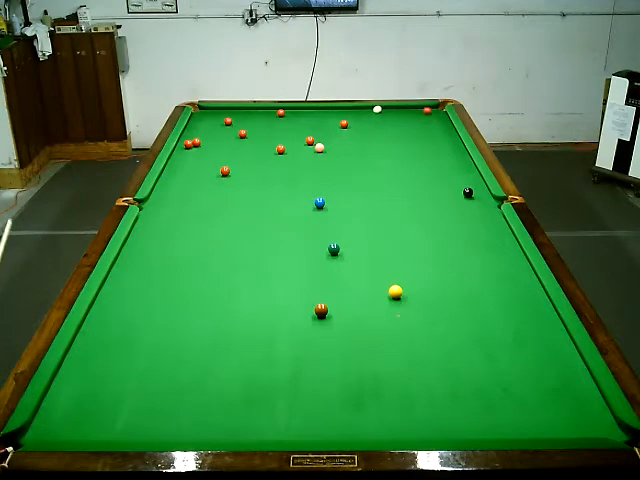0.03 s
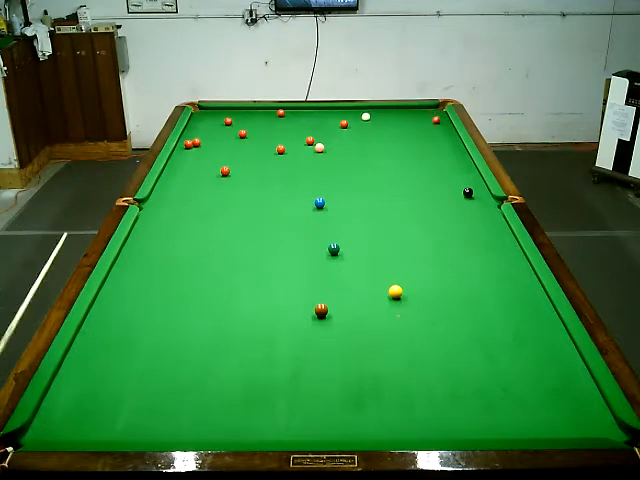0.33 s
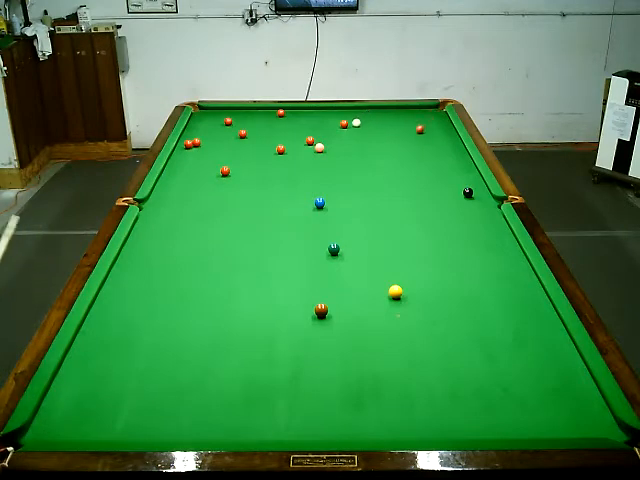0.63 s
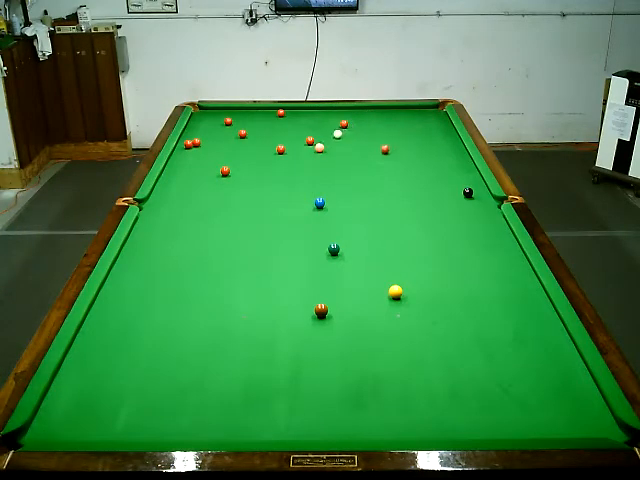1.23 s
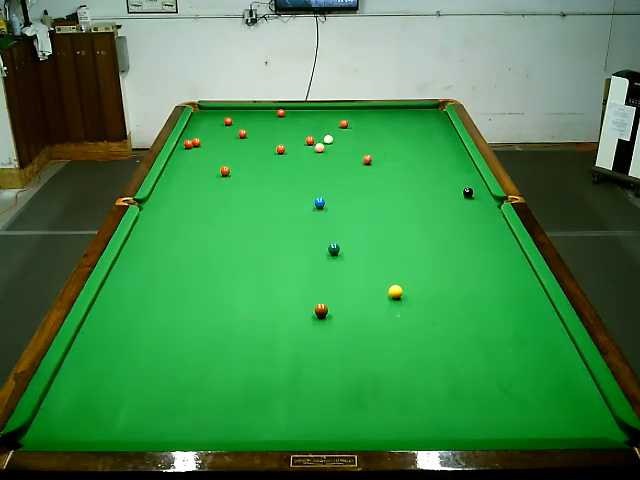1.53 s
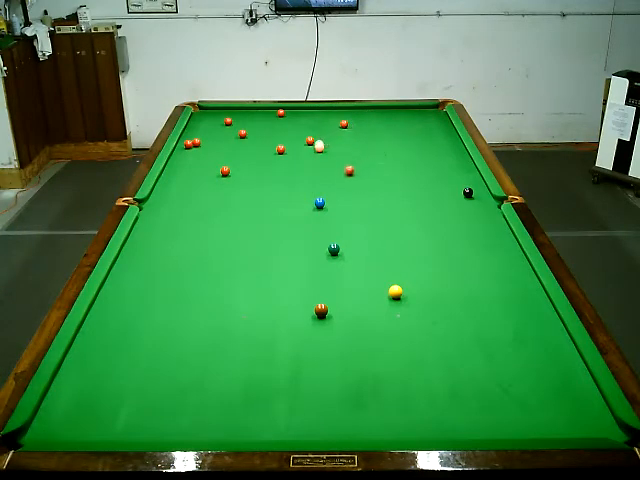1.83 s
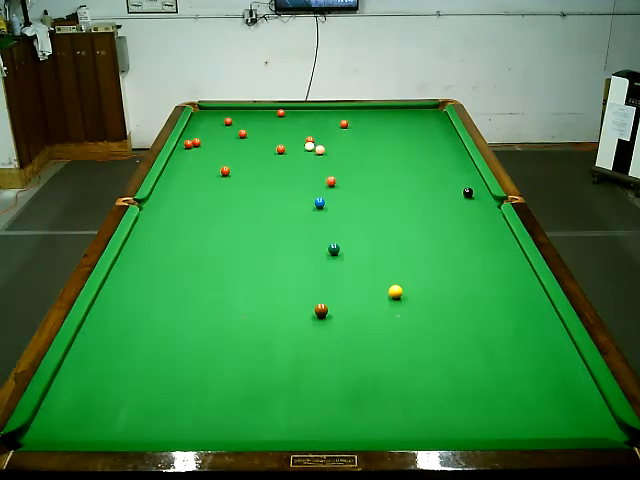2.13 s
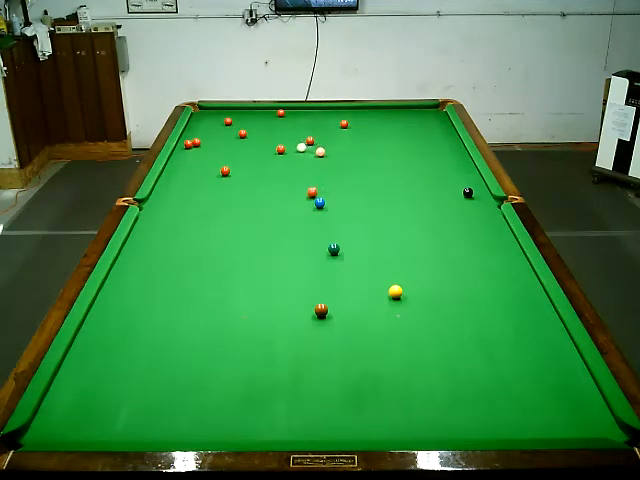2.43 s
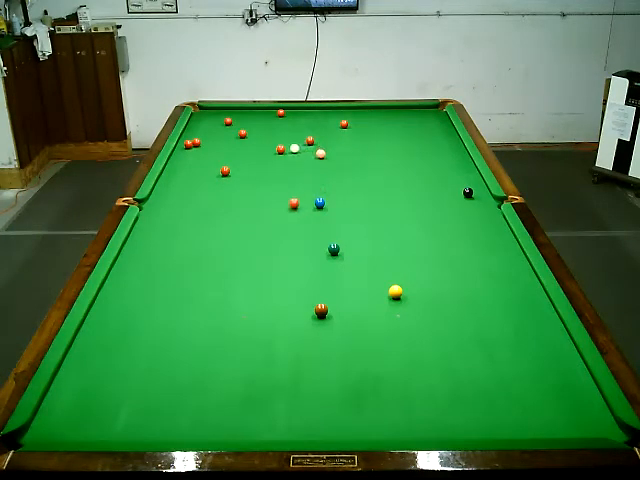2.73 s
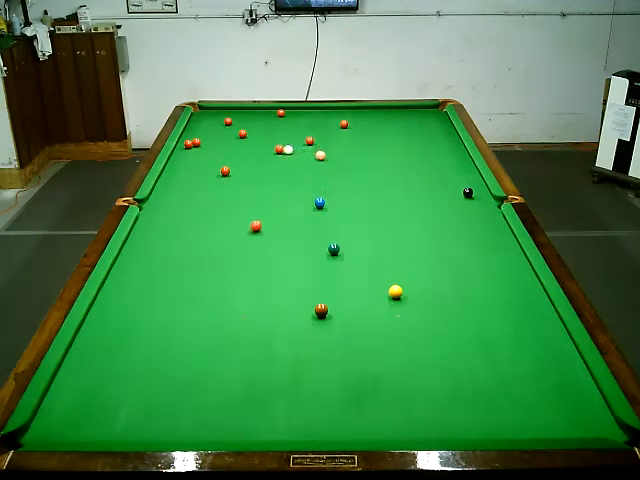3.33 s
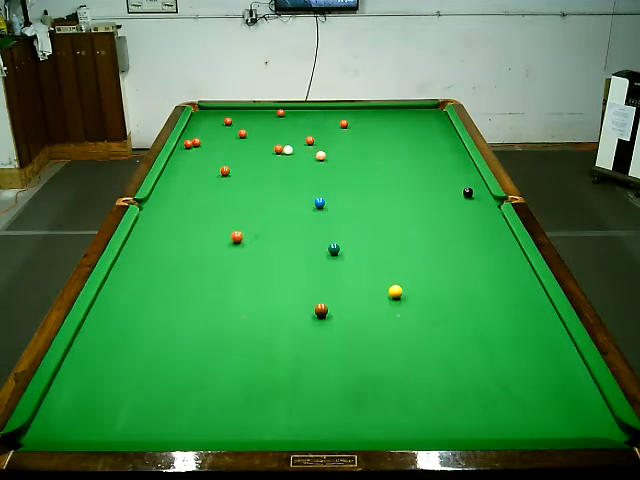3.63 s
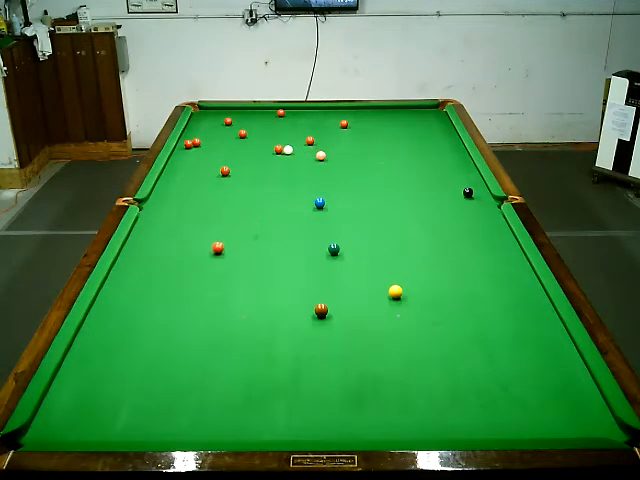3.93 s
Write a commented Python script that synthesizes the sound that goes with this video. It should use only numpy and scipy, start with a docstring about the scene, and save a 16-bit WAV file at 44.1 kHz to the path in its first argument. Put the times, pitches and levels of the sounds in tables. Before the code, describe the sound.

A sharp clack of snooker balls comes from the table's far end, followed immediately by a low knock against the cushion. Two seconds later comes a softer click. The small, dull microphone also catches the room's steady ventilation.

```python
"""A quiet club room, with snooker balls at the far end of the table from a small, dull microphone.
Two hard balls meet in one sharp clack that comes back off the walls and ceiling. Just after it a ball
thumps into the rubber cushion and sets the wooden rail ringing; two seconds after the clack, two balls
touch softly. Behind it all the ventilation rushes and hums, with a thin electrical whine."""
import sys
import numpy as np
from scipy import signal
from scipy.fft import rfft, irfft
from scipy.io import wavfile
from scipy.ndimage import uniform_filter1d

SR = 44100
rng = np.random.default_rng(int(sys.argv[2]) if len(sys.argv) > 2 else 0)


def to_wav(s):
    """Save 16-bit WAV."""
    ch = np.atleast_2d(s).T  # columns
    pcm = np.round(np.clip(ch, -1, 1) * 32767)  # PCM
    wavfile.write(sys.argv[1], SR, pcm.astype(np.int16))


N = 176400

# ball on ball, a slower touch lasting longer and sounding duller:
# t/s, level/dB, contact corner f/Hz, relative reverberation level/dB, relative ringing level/dB
BALL_CONTACTS = [(0.1073, 2.5, 4640, 3, -51.5), (2.1133, -12, 2440, -2.5, -46)]
# colour of a clack on the short paths to the microphone: f/Hz, level/dB
CLACK_NEAR_COLOUR = [(100, -41), (400, -20.5), (620, -12), (800, 0), (1080, 3.5), (1800, 2), (2300, 0),
                     (3100, 2), (3600, -4), (4300, -14), (5000, -36), (5600, -35), (9000, -31)]
# colour of a clack after many bounces round the room: f/Hz, level/dB
CLACK_DIFFUSE_COLOUR = [(100, -40), (550, -13.5), (1000, 2), (1550, 2), (1850, 3.5), (2200, 8), (2650, -2),
                        (3350, -1), (3750, -9.5), (4400, -16.5), (4900, -19), (5400, -43), (9000, -58)]
# ball on cushion: t/s, level/dB
CUSHION_HITS = [(0.177, 1.5)]
# colour of the rubber and its wooden rail: f/Hz, level/dB
CUSHION_COLOUR = [(40, -51), (110, -36.5), (170, -17), (240, 2), (340, -2), (490, 4.5), (750, 2.5),
                  (1200, -7.5), (4000, -62), (9000, -86)]
# modes of the rail and table frame: f/Hz, level/dB, t60/s
RAIL_RESONANCES = [(238, -2.5, 0.39), (279, -3.5, 0.36), (330.4, -2.5, 0.58), (415, -4.5, .35),
                   (510, -5, 0.91)]
# resonances of the room and its fittings: f/Hz, level/dB, t60/s
ROOM_RESONANCES = [(1066, -3, 0.32), (1292, -11.5, 0.63), (1382, -4, 0.61), (1620, -2, 0.95),
                   (2005, -9.5, 0.55), (1910, -5, .35), (2050, 2.5, 0.5), (2224, 4.5, 0.3),
                   (2530, -7.5, 0.66), (3140, -9, .35), (3130, -11, 0.34), (3240, -8, 0.35)]
# early reflections, the first off the nearby cloth or cushion, the rest off walls and ceiling: delay/s,
# level/dB
EARLY_ECHOES = [(.0005, -3), (.0026, 4.5), (.0046, -5.5), (.0066, 2.5), (.0075, 4.5), (0.0092, -8),
                (0.0141, -2.5), (0.019, -11), (0.0197, -3.5), (0.023, -9), (0.0247, -3), (.0286, -4),
                (.0348, -5), (0.038, -12)]
# the room's decay: f/Hz, t60/s
ROOM_DECAY = [(250, 0.87), (1000, 0.64), (2200, 0.53), (3500, 0.61), (4700, 0.68)]
# colour of the ventilation's rush: f/Hz, level/dB
AIR_COLOUR = [(20, -56.5), (45, -41), (80, -35), (118, -20.5), (170, -13), (250, -7.5), (380, -3.5),
              (500, -1.5), (640, -4.5), (810, 1), (920, -3.5), (1060, -2), (1280, -10), (1700, -12.5),
              (2250, -15), (2550, -24), (3000, -25.5), (3550, -22.5), (3800, -28.5), (4600, -30.5),
              (5600, -39.5), (7300, -47), (9500, -58)]
# fan and mains tones: f/Hz, level/dB, width/Hz, steadiness (0 swells freely, 0.5 holds its level)
HUM_TONES = [(61.3, -89.5, 0.41, .4), (276.8, -68.5, 5.5, .3), (414.8, -62.5, 4.1, 0.22),
             (498.6, -64, 16, 0.26), (808, -62.5, 15, 0.057), (832, -67, 16, .05), (1004, -66, 2.3, .4),
             (1234, -76.5, 3.5, .4), (1319, -74.5, 3.3, 0.32), (1362, -71, 3.7, 0.36)]


def amp(db):
    """Decibels to gain."""
    return 10 ** (np.asarray(db) / 20)


def unit_rms(x):
    """Scales to an rms of one."""
    return x / np.sqrt(np.mean(abs(x) ** 2) + 1e-20)


def curve_at(points, hz):
    """Reads a table on a log-frequency axis."""
    f, value = np.transpose(points)
    return np.interp(np.log(hz + 1), np.log(f + 1), value)


def add(mix, start_s, sound):
    """Mixes a sound in at its start time."""
    part = mix[max(round(start_s * SR), 0):][:len(sound)]
    part += sound[:len(part)]


def ball_clacks():
    """Two hard balls meet in one short pulse; at this distance echoes and the room draw it out."""
    out = np.zeros(N)
    paths = short_paths()
    for start_s, db, corner_hz, reverb_db, ring_db in BALL_CONTACTS:
        early = signal.fftconvolve(pulse(CLACK_NEAR_COLOUR, corner_hz), paths)
        diffuse = signal.fftconvolve(pulse(CLACK_DIFFUSE_COLOUR, corner_hz), reverberation(ROOM_DECAY))
        fittings = ringing(ROOM_RESONANCES, rise_s=0.0047, corner_hz=corner_hz)
        add(out, start_s, amp(db) * early)
        add(out, start_s, amp(db + reverb_db) * diffuse)
        add(out, start_s, amp(db + ring_db) * fittings)
    return out


def cushion_thump(t60_s=0.53, direct_db=-8.5, rail_db=-46.5):
    """A ball pushes into the rubber: a low knock, its wash in the room, and the wooden rail ringing."""
    out = np.zeros(N)
    for start_s, db in CUSHION_HITS:
        room = reverberation([(1, t60_s)])  # one decay time for all bands
        room[0] += amp(direct_db)
        add(out, start_s, amp(db) * signal.fftconvolve(pulse(CUSHION_COLOUR), room))
        add(out, start_s, amp(db + rail_db) * ringing(RAIL_RESONANCES, rise_s=0.012))
    return out


def contact_gain(hz, corner_hz):
    """The finite length of a contact cuts off the treble above the corner."""
    return 1 / np.sqrt(1 + (hz / corner_hz) ** 12)


def pulse(colour, corner_hz=np.inf, size=4096):
    """One blow: a causal pulse of the given colour, rolled off by the contact time."""
    hz = abs(np.fft.fftfreq(size, 1 / SR))
    gain = amp(curve_at(colour, hz)) * contact_gain(hz, corner_hz)
    minimum_phase = np.exp(np.conj(signal.hilbert(np.log(gain + 1e-5))))
    return np.fft.ifft(minimum_phase).real[:size // 2]


def ringing(modes, rise_s, corner_hz=np.inf):
    """Resonances swell up after a blow and die away."""
    t = np.arange(SR) / SR
    rings = np.zeros(SR)
    for hz, db, t60 in modes:
        envelope = contact_gain(hz, corner_hz) * amp(db - 60 * t / t60)
        rings += envelope * np.sin(2 * np.pi * (hz * t + rng.random()))
    return (1 - np.exp(-t / rise_s)) * rings


def short_paths(direct_db=-6.5, echo_db=-9.5):
    """Sound reaches the microphone straight down the table, then off the nearby cloth or cushion, the walls and
    ceiling."""
    paths = np.zeros(SR // 10)
    paths[0] = amp(direct_db)
    for delay_s, db in EARLY_ECHOES:
        add(paths, delay_s, amp(echo_db + db) * reflection())
    return paths


def reflection(smear_s=0.00096, scattered_share=0.66, band_hz=4017, size=128):
    """One bounce off an uneven surface: a mirror image and a brief scattered smear."""
    smear = rng.standard_normal(size) * np.exp(-np.arange(size) / SR / smear_s)
    smear = signal.lfilter(*signal.butter(2, 4000, fs=SR), smear)
    in_band = abs(rfft(smear))[np.fft.rfftfreq(size, 1 / SR) < band_hz]
    bounce = smear * np.sqrt(scattered_share / np.mean(in_band ** 2))
    bounce[0] += np.sqrt(1 - scattered_share)  # the mirror image
    return bounce


def reverberation(decay, rise_s=0.0079, size=256):
    """The room's diffuse tail, of energy one: dense reflections dying by each band's decay time."""
    reflections = rng.choice([-1., 1.], SR) * (rng.random(SR) < .2)
    hz, t, bands = signal.stft(reflections, SR, nperseg=size)
    fade = amp(-60 * t / curve_at(decay, hz)[:, None])
    tail = signal.istft(bands * fade, SR, nperseg=size)[1][:SR]
    tail *= 1 - np.exp(-np.arange(SR) / SR / rise_s)
    return tail / np.linalg.norm(tail)


def ventilation(level_db=-49, turbulence_db=1.06, size=2048):
    """Room tone: a steady rush of air with slight turbulent patches."""
    hz = np.fft.rfftfreq(size, 1 / SR)
    hop = size // 4
    real, imag, patches = rng.standard_normal((N // hop + 5, len(hz), 3)).T
    patches = uniform_filter1d(patches, size=14, axis=0)  # smooth across frequency
    patches = unit_rms(uniform_filter1d(patches, size=6, axis=1))  # and across time
    bands = (real + 1j * imag) * amp(curve_at(AIR_COLOUR, hz)[:, None] + turbulence_db * patches)
    air = signal.istft(bands, nperseg=size, noverlap=size - hop)[1][:N]
    return amp(level_db) * unit_rms(air)


def fan_hum():
    """Fan and mains tones, each wandering in phase and level."""
    t = np.arange(N) / SR
    hum = np.zeros(N)
    for hz, db, width_hz, steadiness in HUM_TONES:
        wander = drift(width_hz)
        wander /= (1 + abs(wander) ** 2) ** steadiness  # evens out the largest swells
        hum += amp(db) * unit_rms((wander * np.exp(2j * np.pi * hz * t)).real)
    return hum


def electrical_whine(hz=8236, level_db=-86.5, waver_db=1.8):
    """One thin electrical tone, far back, its level flickering."""
    flicker = unit_rms(drift(width_hz=20).real)
    tone = unit_rms(np.cos(2 * np.pi * hz * np.arange(N) / SR))
    return amp(level_db + waver_db * flicker) * tone


def drift(width_hz):
    """A slow complex random wander of rms one."""
    hz = np.fft.fftfreq(N, 1 / SR)
    phases = np.exp(2j * np.pi * rng.random(N))
    return unit_rms(np.fft.ifft(phases / (1 + (2 * hz / width_hz) ** 2)))


def scene():
    """The table over the room tone, in mono at the microphone's position."""
    return (ball_clacks() + cushion_thump() + ventilation() + fan_hum() + electrical_whine())[None]


def record(dry):
    """The sound has one narrow notch near 4 kHz and loses the top of the treble."""
    notch_hz, half_width_hz, depth_db, top_hz = 4017, 174, -21, 9560
    hz = np.fft.rfftfreq(2 * N, 1 / SR)
    notch = amp(depth_db * np.exp(-((hz - notch_hz) / half_width_hz) ** 2))
    coloured = irfft(rfft(dry, 2 * N) * notch)[:, :N]
    lowpass = signal.firwin(511, top_hz, window=("kaiser", 9), fs=SR)
    return signal.oaconvolve(coloured, lowpass[None], "same")


dry = scene()
out = record(dry)
to_wav(out)
```